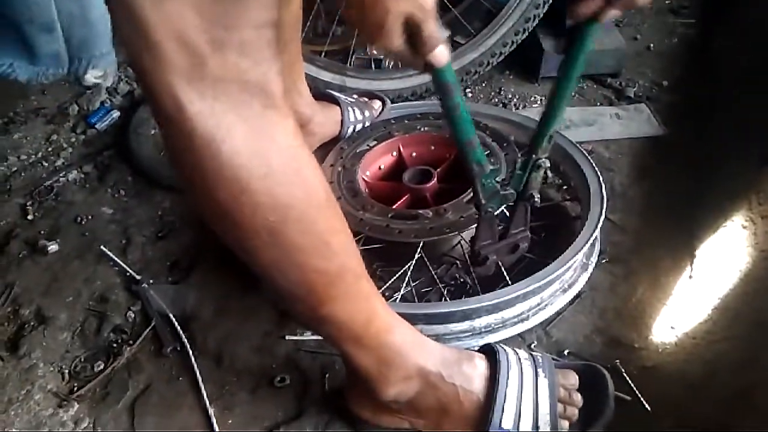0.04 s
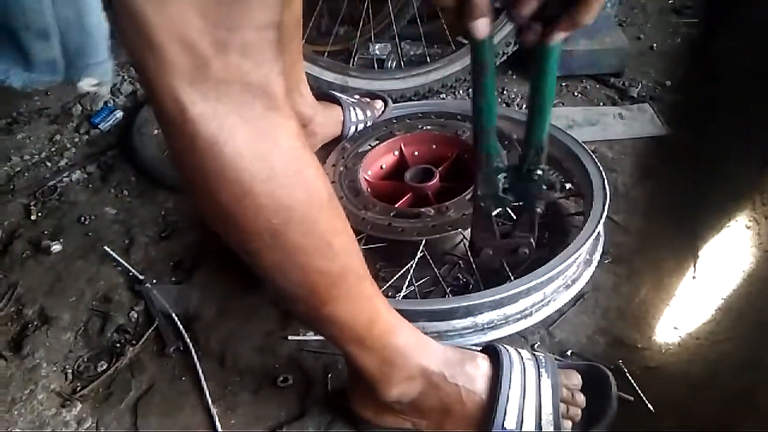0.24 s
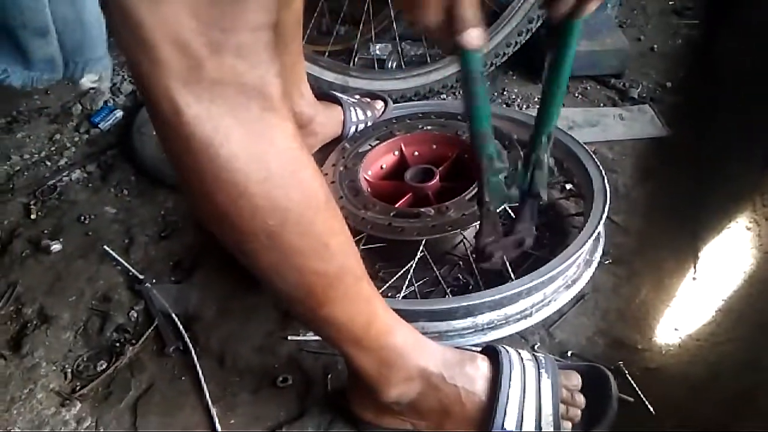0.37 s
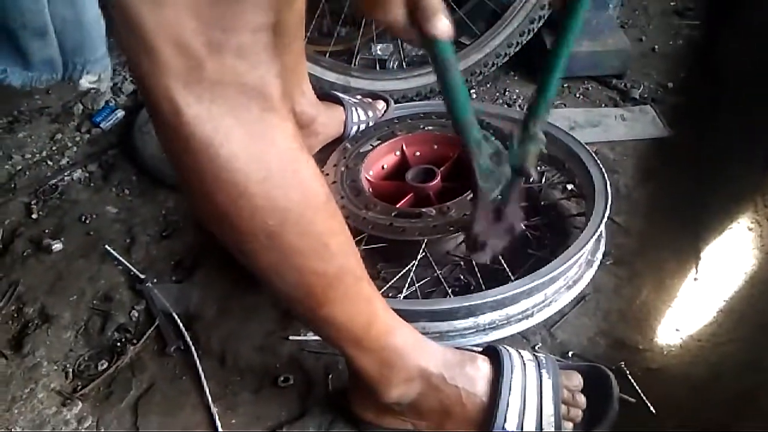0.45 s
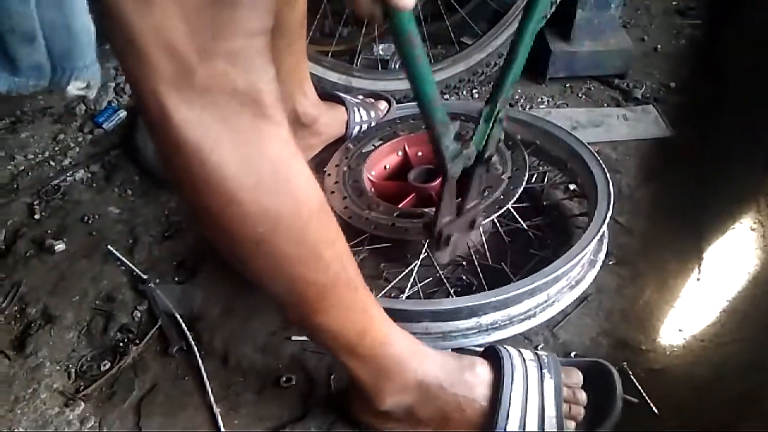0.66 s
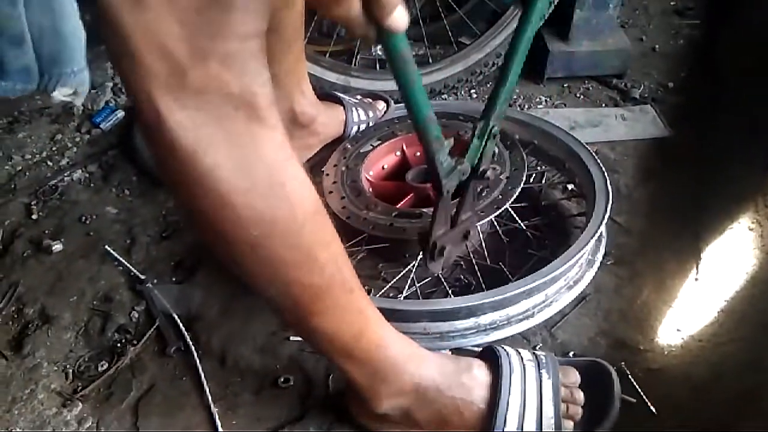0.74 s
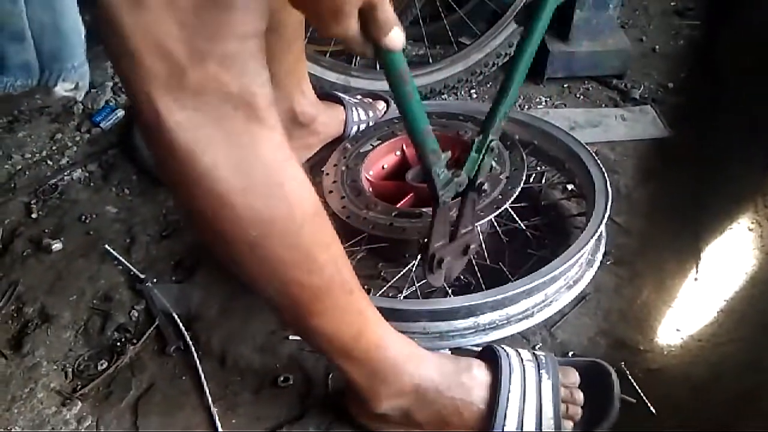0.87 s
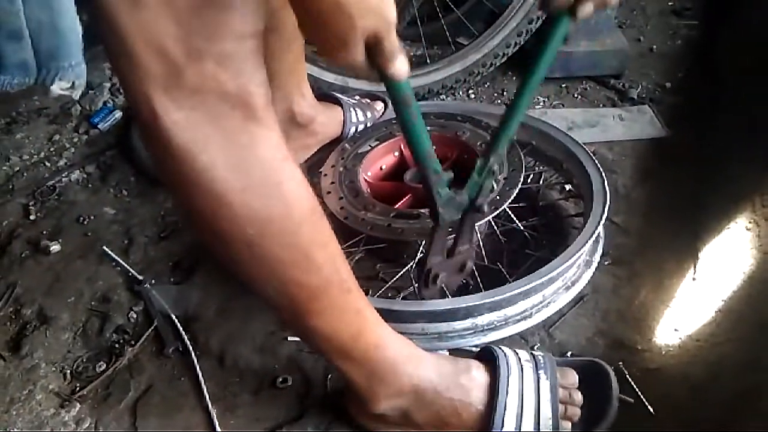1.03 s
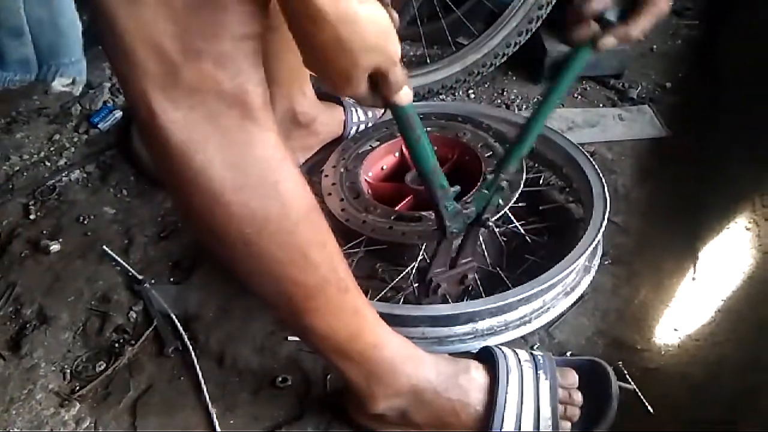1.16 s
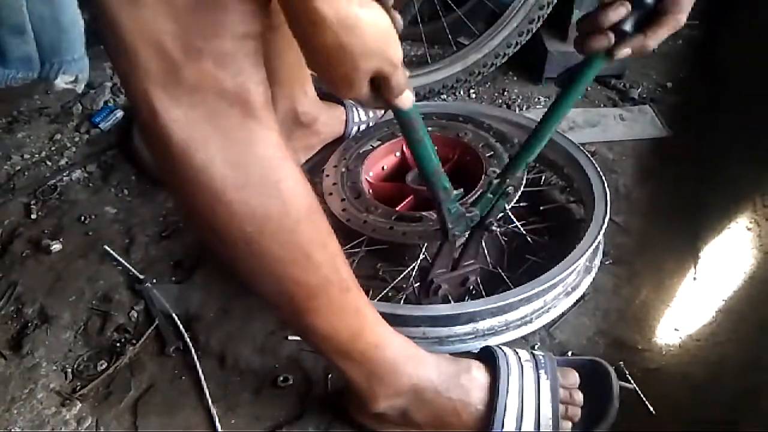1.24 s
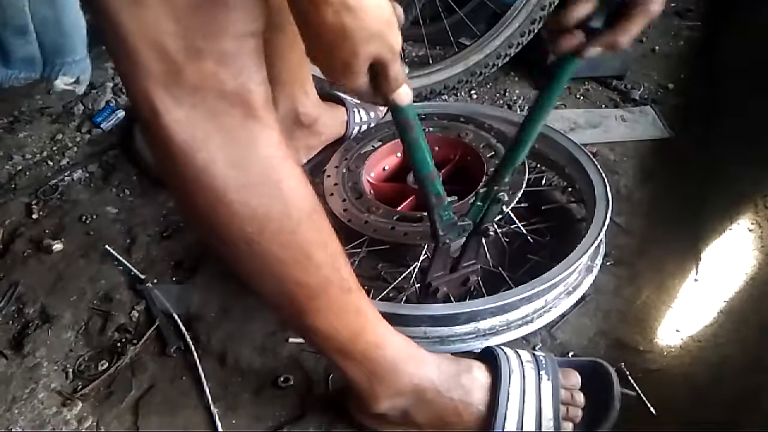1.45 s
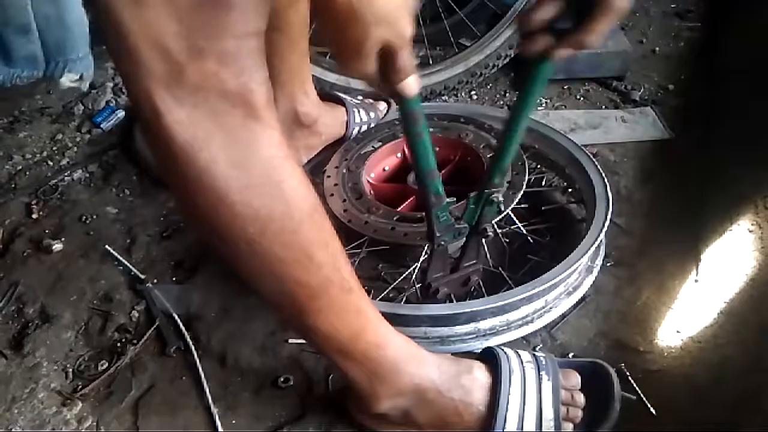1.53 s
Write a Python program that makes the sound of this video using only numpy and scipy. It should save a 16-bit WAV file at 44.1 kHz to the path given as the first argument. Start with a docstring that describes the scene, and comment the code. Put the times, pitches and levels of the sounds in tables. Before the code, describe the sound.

Bolt cutters snap a steel wheel spoke: after a faint creak, a sharp crack comes at about 0.25 seconds with a brief, bright ring. A light tick follows at 0.4 and a tiny ping at 0.5. Around 1.1 seconds the jaws tick, then clack three times between 1.2 and 1.3, knocking on the rim. A faint motor hum and hiss lie underneath, in a small workshop with short reflections.

```python
"""A small workshop, where bolt cutters snap a steel wheel spoke. The fracture gives a hard broadband
crack, and the freed ends chatter and ring in their modes. A loose piece pings; the jaws tick against the
spokes, knock on the rim and clack three times as they open for the next cut. Friction adds creaks and
scuffs, a motor throbs behind a faint hiss, and reflections from the close walls answer every blow."""
import sys
import numpy as np
from scipy import signal
from scipy.fft import rfft, irfft, next_fast_len
from scipy.io import wavfile
from scipy.ndimage import map_coordinates

SR = 44100
rng = np.random.default_rng(int(sys.argv[2]) if len(sys.argv) > 2 else 0)


def put_to_file(sound):
    """Save the sound as 16-bit audio at rate SR, in the file named by the first command-line argument."""
    columns = np.atleast_2d(sound).T  # one column per channel
    safe = np.clip(columns, -1, 1)
    whole_steps = np.round(safe * 32767)
    wavfile.write(sys.argv[1], SR, whole_steps.astype(np.int16))


N = 70560
STEEL_ALIKE = 0.17  # left-right correlation of the impact noise
TOOL_LEFT_DB, BODY_WET_DB = -1.1, -12  # balance at the jaws; reverberation of thump and jaw ring


def amp(db):
    """Decibels as an amplitude ratio."""
    return 10 ** (np.asarray(db) / 20)


def unit(x):
    """The signal scaled to rms 1."""
    return x / np.sqrt(np.mean(x ** 2) + 1e-20)


def clock():
    """The time of each sample in seconds."""
    return np.arange(N) / SR


def along(points, hz):
    """Interpolation of (Hz, value) points on a logarithmic frequency axis."""
    f, v = np.transpose(points)
    return np.interp(np.log(hz + 1), np.log(f + 1), v)


def curve(rows):
    """Linear interpolation of (seconds, value) points at every sample."""
    return np.interp(clock(), *np.transpose(rows))


def wobble(rate):
    """Smooth random modulation: a spline through rate knots a second."""
    return map_coordinates(rng.standard_normal(4096), [clock() * rate], mode="mirror")


def filtered(x, response):
    """Linear filtering: the spectrum of x times a frequency response."""
    m = next_fast_len(N + SR // 2)
    return irfft(rfft(x, m) * response(np.fft.rfftfreq(m, 1 / SR)), m)[..., :N]


def lean(left_db):
    """Level difference: the left channel rises by left_db and the right falls as much."""
    return amp([[left_db], [-left_db]])


def noise(spectrum, alike):
    """Partial coherence: two coloured noises mixed to a left-right correlation of alike; rms 1."""
    a, b = filtered(rng.standard_normal((2, N)), lambda hz: amp(along(spectrum, hz)))
    angle = np.arccos(np.clip(alike, -1, 1)) / 2
    mid, side = np.cos(angle) * a, np.sin(angle) * b
    return unit(np.array([mid + side, mid - side]))


def band(hz, width_hz):
    """Heavy damping: a broad resonance driven by friction or impact; rms 1."""
    x = filtered(rng.standard_normal((2, N)), lambda f: 1 / (1 + (2 * (f - hz) / width_hz) ** 4))
    return unit(x + .08 * x[::-1])  # a little of each side reaches the other


def burst(start, hold, t60, attack=0.0002):
    """Damped excitation: a linear attack and, hold seconds after the start, exponential decay."""
    t = clock() - start
    return np.clip(t / attack, 0, 1) * amp(-60 * np.maximum(t - hold, 0) / t60)


def tone(hz, blur=0):
    """One mode of rms 1, reaching each side with its own delay; blur is phase jitter in radians."""
    t = clock() + 0.00029 * rng.standard_normal((2, 1))
    return np.sqrt(2) * np.sin(2 * np.pi * (hz * t + rng.random()) + blur * wobble(90))


def in_room(x, wet_db):
    """Reverberation: wall reflections build up behind the direct sound and die away band by band."""
    # Decay of the room. Each row: frequency in Hz, reverberation time in seconds.
    decay = [(300, 0.54), (1000, 0.4), (3000, 0.19), (9000, 0.2), (15000, 0.16)]
    # Colour of the reflections. Each row: frequency in Hz, relative level in dB.
    colour = [(300, -7), (900, -2.5), (3000, 0), (6000, 3.5), (10000, -1.5), (15000, 1)]
    build_s = 0.0076
    hz, t, spectra = signal.stft(rng.standard_normal((2, SR // 2)), SR, nperseg=256)
    fade = amp(along(colour, hz)[:, None] - 60 * t / along(decay, hz)[:, None])
    tail = signal.istft(spectra * fade, SR, nperseg=256)[1]
    tail *= 1 - np.exp(-np.arange(tail.shape[1]) / SR / build_s)
    wet = signal.fftconvolve(x[:1], tail / np.linalg.norm(tail[0]), axes=1)[:, :N]
    return x + amp(wet_db) * lean(1.78) * wet


def motor():
    """Periodic forcing: harmonics of a motor beyond the walls make one throb a turn, over a rumble."""
    # Lines of the hum. Each row: multiple of the turning rate, relative level in dB.
    harmonics = [(3, -69), (4, -60.5), (5, -53), (6, -62.5), (8, -59.5), (9, -73), (10, -78), (13, -78),
                 (14, -78)]
    # Envelope of hum and rumble. Each row: time in seconds, level in dB.
    hum_level = [(0.0, -55.5), (0.048, -54), (0.338, -53.5), (0.52, -59), (1.234, -60), (1.6, -65)]
    # Envelope of the lowest line, the second harmonic. Each row: time in seconds, level in dB.
    boom_level = [(0.0, -60.5), (0.098, -68), (0.15, -57), (0.23, -51), (0.27, -75), (0.316, -51.5),
                  (0.356, -74), (0.426, -52), (0.646, -62.5), (0.752, -73), (1.6, -66.5)]
    # Spectrum of the rumble. Each row: frequency in Hz, relative density in dB.
    rumble_spectrum = [(20, -3), (100, -4), (250, -1), (480, -19.5), (700, -21), (1500, -58.5)]
    turn_hz, drift = 32.04, 0.0027
    dispersion_rad = .55  # the walls delay the low lines, so each throb sweeps down
    turn = 2 * np.pi * np.cumsum(turn_hz * (1 + drift * wobble(4.6))) / SR
    hum = unit(sum(amp(db) * np.cos(k * turn + dispersion_rad * k ** 2 / 2) for k, db in harmonics))
    boom = amp(curve(boom_level)) * unit(np.cos(2 * turn))
    rumble = amp(-11.5) * noise(rumble_spectrum, alike=0.94)
    return boom + amp(curve(hum_level)) * (amp(-0.5) * hum + rumble)


def air():
    """Diffuse background noise: a faint, fading hiss, nearly uncorrelated between left and right."""
    # Spectrum of the hiss. Each row: frequency in Hz, relative density in dB.
    spectrum = [(240, -17), (400, 3), (600, -9), (800, -8), (1100, -12.5), (2300, -11.5), (5650, -22.5),
                (7500, -23.5), (9650, -13), (12000, -23), (13500, -40.5), (15500, -50)]
    # Envelope of the hiss. Each row: time in seconds, level in dB.
    level = [(0, -64), (.2, -66.5), (.55, -66.5), (.7, -69.5), (1.1, -70.5), (1.5, -73)]
    return amp(curve(level)) * noise(spectrum, alike=0.1)


def creak_and_scuffs():
    """Stick-slip friction: the loaded spoke creaks, and wheel and tool scuff as they shift."""
    # Resonances of the creak. Each row: centre in Hz, width in Hz, level in dB.
    resonances = [(480, 280, -63.5), (3200, 720, -72)]
    # Scuffs. Each row: start in seconds, level in dB, centre in Hz, width in Hz, length in seconds.
    slips = [(0.13, -59.5, 4180, 2820, 0.0033), (0.238, -44, 6500, 7400, .008),
             (0.398, -68, 3270, 1610, 0.16), (0.472, -61, 2290, 520, 0.012),
             (0.467, -65.5, 6000, 2390, 0.027), (0.536, -66, 5570, 2460, 0.04),
             (0.731, -71, 777, 296.4, 0.086), (1.194, -55, 2220, 1020, 0.032),
             (1.198, -57.5, 880, 418, 0.017), (1.204, -56.5, 390, 168, 0.019)]
    creak_rough_db, scuff_rough_db = 5, 4
    creak = sum(amp(db) * unit(amp(creak_rough_db * wobble(170)) * band(hz, width))
                for hz, width, db in resonances)
    creak *= burst(0, hold=0.14, t60=.5)
    scuffs = sum(amp(db) * burst(start, length, t60=.03, attack=0.0036) * band(hz, width)
                 for start, db, hz, width, length in slips)
    catching = unit(amp(scuff_rough_db * wobble(220)))
    return in_room(creak + catching * scuffs, wet_db=-8.5)


def ticks():
    """Brief contact has a wide spectrum: the jaws touch the spokes in light, bright ticks."""
    # Touches of steel on steel. Each row: start in seconds, level in dB, length in seconds.
    touches = [(0.129, -56.5, 0.0031), (0.3975, -43.5, 0.0019), (0.994, -64, 0.018), (1.1256, -58, 0.0043),
               (1.1407, -53.5, 0.0041), (1.1536, -44.5, 0.014)]
    # Spectrum of a tick. Each row: frequency in Hz, relative density in dB.
    spectrum = [(1500, -22.5), (3200, -13.5), (4900, -17), (7000, -8), (9800, -2), (12000, -4.5),
                (13500, -18.5), (15500, -24)]
    envelope = sum(amp(db) * burst(start, length, t60=0.013, attack=.12 * length)
                   for start, db, length in touches)
    return lean(TOOL_LEFT_DB) * in_room(envelope * noise(spectrum, STEEL_ALIKE), wet_db=0)


def snap():
    """Fracture releases stored strain: the spoke cracks, its ends chatter on the jaws and ring."""
    # Spectrum of the crack. Each row: frequency in Hz, relative density in dB.
    crack_spectrum = [(200, -40), (400, -24), (620, -13.5), (1500, -13), (2400, -9), (4000, -19.5),
                      (6000, -1), (7500, -8), (10000, 0), (12800, -1.5), (14000, -10.5), (15800, -14)]
    # Spectrum of the shivering ends. Each row: frequency in Hz, relative density in dB.
    shiver_spectrum = [(500, -31), (850, -17.5), (1100, -28.5), (2400, -13.5), (5000, -8.5), (7500, -2.5),
                       (10000, 3), (12300, -5.5), (14200, -7.5), (15600, -26.5)]
    # Resonances of the cut spoke. Each row: centre in Hz, width in Hz, relative level in dB.
    resonances = [(6180, 500, -11), (9260, 610, -1), (11300, 440, -0.5), (12680, 320, -0.5)]
    start = .2458
    crack = amp(-24) * burst(start, hold=0.0082, t60=0.054) * noise(crack_spectrum, STEEL_ALIKE)
    # The rim jumps, freed of the spoke's pull.
    thump = amp(-42) * burst(start, hold=0, t60=0.026) * tone(hz=627.5)
    chatter = unit(amp(wobble(700)) * noise(shiver_spectrum, STEEL_ALIKE))
    shiver = amp(-25.5) * burst(start, hold=0.062, t60=0.17) * chatter
    modes = unit(sum(amp(db) * band(hz, width) for hz, width, db in resonances))
    ring = amp(-24.5) * burst(start, hold=.054, t60=.16) * modes
    steel = lean(-1.2) * crack + lean(.5) * (shiver + ring)
    return in_room(steel, wet_db=-13.5) + in_room(thump, BODY_WET_DB)


def ping():
    """Free vibration: a loose piece rings in high, inharmonic modes and sizzles as it settles."""
    # Modes of the piece. Each row: frequency in Hz, relative level in dB, 60 dB decay time in seconds.
    modes = [(7660, -4, .07), (9490, -6, .12), (9598, 3, .12), (11810, -3, .13), (12330, -6, .07),
             (13730, -11, .1), (14520, -12, .05), (14880, -8, .08)]
    start = 0.501
    ring = amp(-54) * sum(amp(db) * burst(start, hold=0.017, t60=t60) * tone(hz, blur=.65)
                          for hz, db, t60 in modes)
    sizzle = amp(-54.5) * burst(start, hold=.03, t60=0.013) * band(hz=10386, width_hz=2200)
    return lean(TOOL_LEFT_DB) * (in_room(sizzle, wet_db=0) + in_room(ring, wet_db=-6))


def clacks():
    """Impact excitation: a few milliseconds of hard contact set two modes of the jaws ringing."""
    # Clacks of the jaws. Each row: start in seconds, level in dB, swell in seconds, lower mode in Hz,
    # relative levels of the lower and upper modes in dB, tilt of the contact noise in dB per octave.
    impacts = [(1.1757, -21.5, 0.0055, 3113, -14.5, -35, 2.5),
               (1.241, -22.5, 0.0045, 3170, -9, -12.5, -1.5), (1.3038, -24, 0.0034, 3024, -7.5, -13, 1)]
    # Spectrum of the contact before tilting. Each row: frequency in Hz, relative density in dB.
    spectrum = [(290, -45), (550, -31.5), (1400, -19.5), (2520, -13), (3400, 0), (5270, -13), (6740, -5),
                (7450, -7), (10000, 6), (13700, -2.5), (15800, -9.5)]
    pivot_hz, upper_ratio = 9000, 1.45
    out = np.zeros((2, N))
    for start, db, swell, jaw_hz, lower_db, upper_db, tilt_db in impacts:
        colour = [(hz, level + tilt_db * np.log2(hz / pivot_hz)) for hz, level in spectrum]
        contact = burst(start, swell, t60=0.014, attack=0.0013) * noise(colour, STEEL_ALIKE)
        lower = amp(lower_db) * tone(jaw_hz, blur=0.7)
        upper = amp(upper_db) * band(upper_ratio * jaw_hz, width_hz=1000)
        ring = burst(start, swell, t60=0.024, attack=swell) * (lower + upper)
        out += amp(db) * (in_room(contact, wet_db=-2) + in_room(ring, BODY_WET_DB))
    return lean(TOOL_LEFT_DB) * out


def knocks():
    """Damped oscillation: the cutter head knocks on the rim; the hardest blow leaves a faint ring."""
    # Knocks on the rim. Each row: start in seconds, level in dB, frequency in Hz.
    blows = [(1.176, -49, 850), (1.241, -36.5, 860), (1.249, -40, 2250), (1.305, -48, 1040),
             (1.308, -45, 2080), (1.337, -54, 900)]
    swell_s = .0035
    hits = sum(amp(db) * burst(start, swell_s, t60=.024, attack=swell_s) * tone(hz, blur=0.5)
               for start, db, hz in blows)
    hardest_s = max(blows, key=lambda row: row[1])[0]
    return in_room(hits, wet_db=-16) + amp(-73) * burst(hardest_s, hold=0, t60=1.0) * tone(hz=770)


def scene():
    """Superposition: the sounds of cutters and wheel add to the workshop's background."""
    work = snap() + clacks() + knocks() + ticks() + ping() + creak_and_scuffs()
    return work + lean(0.5) * (motor() + air())


def record(dry):
    """Frequency response of two sound ports: the left is more open, and both are band-limited."""
    # Imbalance of the ports. Each row: frequency in Hz, dB added on the left and taken from the right.
    imbalance = [(60, 2.5), (250, 3), (600, 2), (2500, 5), (5000, 5), (9000, 3), (13000, 1)]
    cutoff_hz, edge_hz = 16000, 400
    ports = filtered(dry, lambda hz: amp(np.outer([1, -1], along(imbalance, hz))))
    return filtered(ports, lambda hz: np.clip((cutoff_hz - hz) / edge_hz + .5, 0, 1))


dry = scene()
out = record(dry)
put_to_file(out)
```